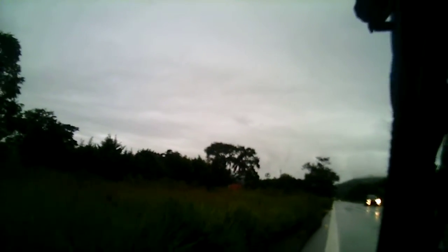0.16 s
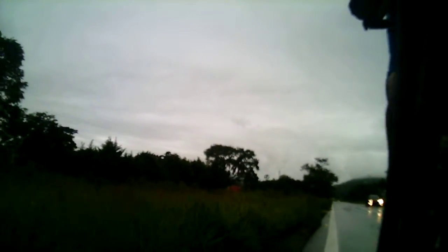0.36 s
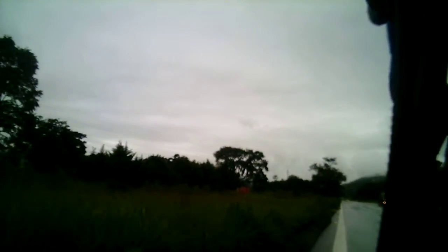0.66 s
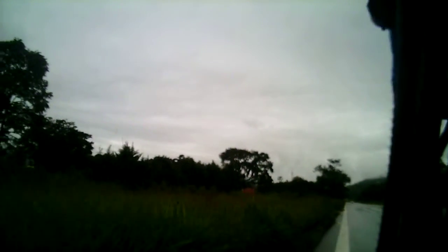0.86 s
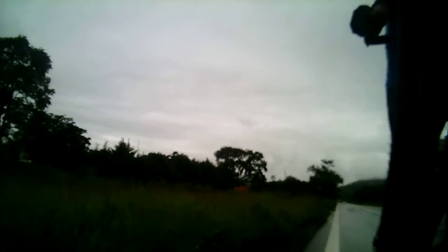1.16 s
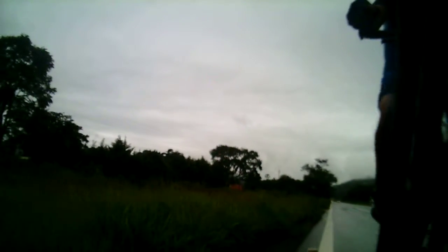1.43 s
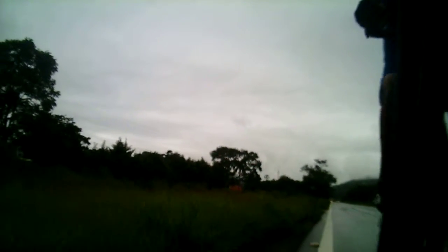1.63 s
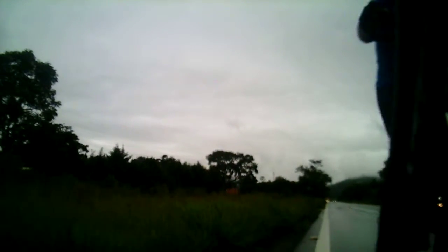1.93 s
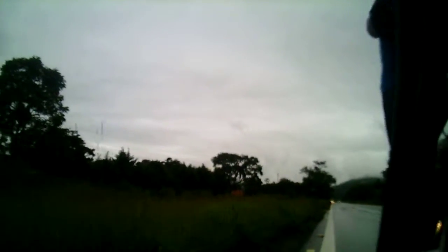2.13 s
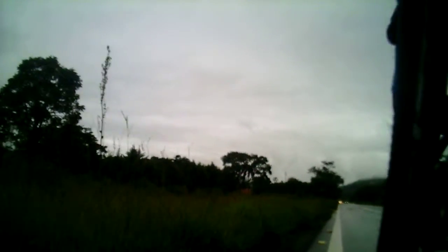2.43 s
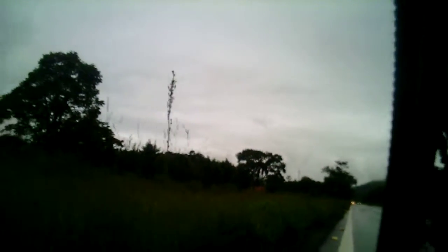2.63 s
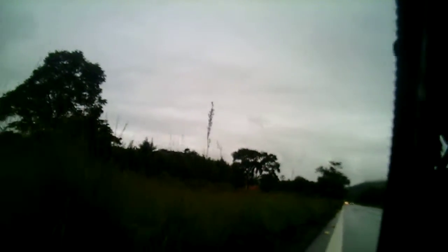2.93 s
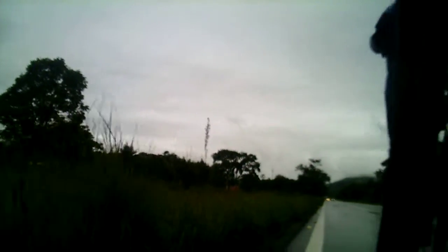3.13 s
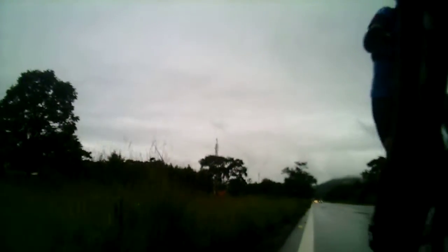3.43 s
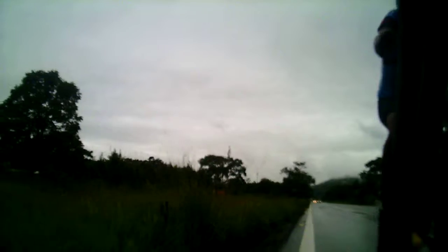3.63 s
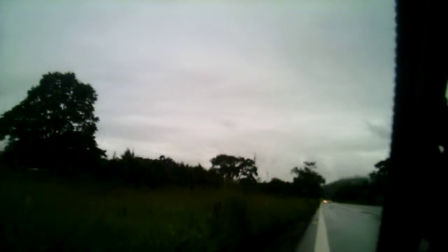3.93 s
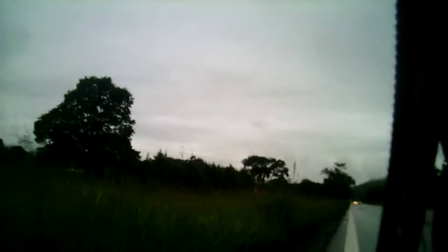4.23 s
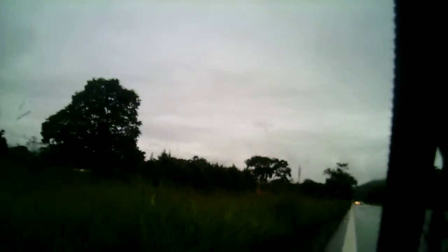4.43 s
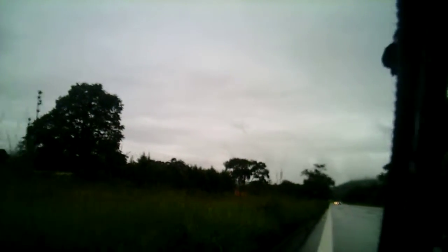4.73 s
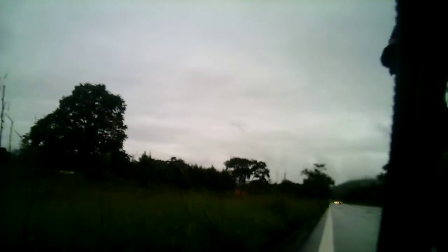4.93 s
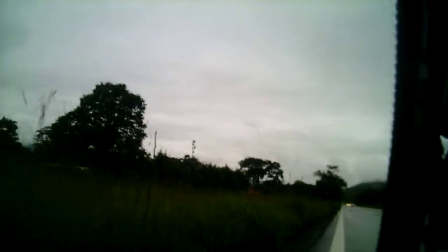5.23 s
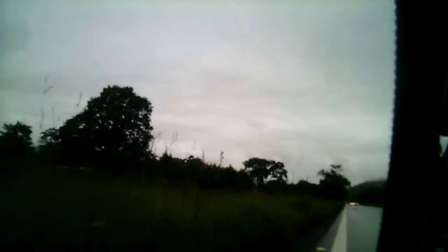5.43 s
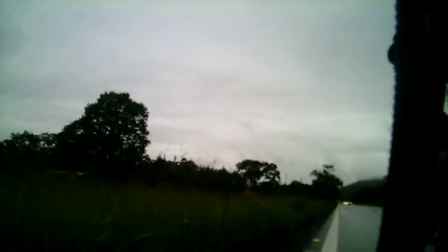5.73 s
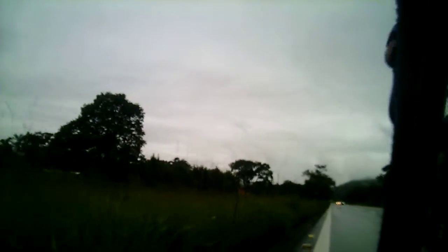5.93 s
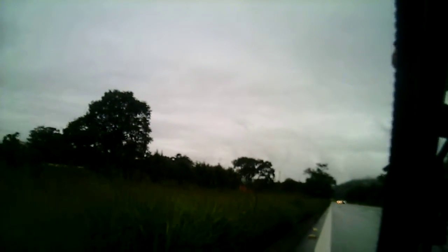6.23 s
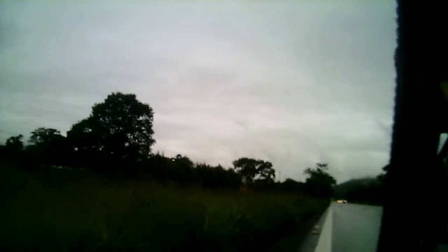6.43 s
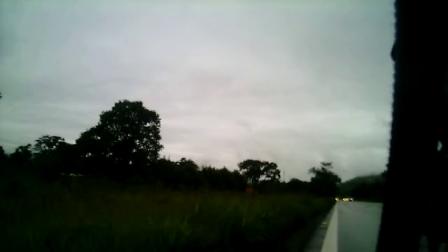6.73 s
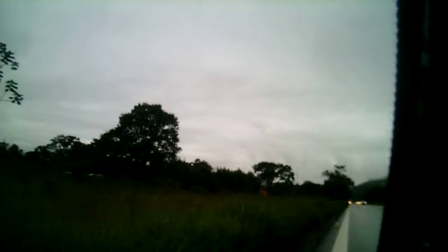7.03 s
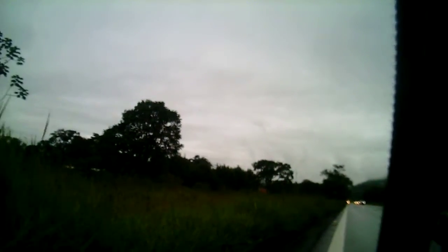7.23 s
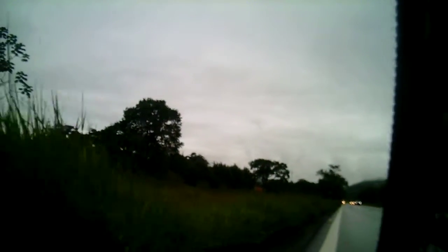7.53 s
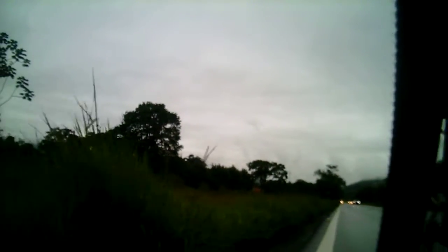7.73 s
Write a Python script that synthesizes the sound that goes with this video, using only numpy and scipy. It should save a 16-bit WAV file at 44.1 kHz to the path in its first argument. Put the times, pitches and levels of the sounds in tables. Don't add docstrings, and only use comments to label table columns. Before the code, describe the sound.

A bicycle rolls along a wet country road, heard through a microphone clamped to its frame. A low tyre hum swells and sinks with each pedal stroke over lumpy rumble and faint gritty buzz. Chain links tick irregularly throughout, with harder knocks and soft bump thuds. After five and a half seconds a stone cracks violently against the case, overloading; another sharp knock follows and the rolling continues.

```python
import sys
import numpy as np
from scipy import signal
from scipy.io import wavfile
from scipy.ndimage import uniform_filter1d

SR = 44100
rng = np.random.default_rng(int(sys.argv[2]) if len(sys.argv) > 2 else 0)


def volts(x):
    e = np.asarray(x, float) / 20
    return 10 ** e


def int16_out(signal):
    q = np.round(np.clip(np.atleast_2d(signal).T, -1, 1) * 32767)
    wavfile.write(sys.argv[1], SR, q.astype(np.int16))


N = 347067

# time in seconds, pitch in Hz.
HUM_PITCH = [(0.0, 94.1), (0.58, 90.5), (1.04, 96.6), (1.29, 92.2), (1.64, 96.0), (2.02, 91.6),
             (2.26, 97.0), (2.94, 93.1), (3.96, 99.7), (4.41, 96.0), (4.66, 100.9), (5.32, 96.0),
             (5.84, 102.8), (6.4, 102.6), (6.49, 96.2), (7.01, 101.2), (7.15, 96.8), (7.87, 96.7)]
# centre in seconds, length in seconds, peak hum in dB.
LOAD_SURGES = [(-0.0, 0.34, -37.5), (0.23, 0.09, -30.5), (0.46, 0.06, -31.5), (0.652, 0.22, -28.5),
               (0.887, 0.25, -36), (1.255, 0.1, -27), (1.386, 0.37, -31), (1.884, 0.23, -29.5),
               (1.97, 0.5, -37), (2.236, 0.22, -33.5), (2.499, 0.16, -31.5), (2.732, 0.36, -36),
               (3.214, 0.39, -27), (3.51, 0.5, -39), (3.719, 0.11, -29.5), (3.85, 0.11, -35),
               (4.061, 0.1, -33), (4.364, 0.32, -33.5), (4.555, 0.14, -37), (4.877, 0.16, -34),
               (5.199, 0.62, -40), (5.502, 0.15, -26), (5.67, 0.23, -32.5), (6.141, 0.34, -31),
               (6.38, 0.08, -31.5), (6.618, 0.22, -29), (6.862, 0.31, -31.5), (7.271, 0.18, -34.5),
               (7.546, 0.29, -35.5), (7.853, 0.2, -27.5)]
# time in seconds, rumble level in dB.
ROAD_COARSENESS = [(0, -40), (.32, -45.5), (.5, -42), (1.0, -44.5), (1.4, -42), (2.9, -42), (3.14, -39.5),
                   (3.62, -43), (4.24, -41), (5.7, -39), (6.6, -39), (7.36, -41.5), (7.87, -41)]
# frequency in Hz, density in dB per Hz.
RUMBLE_SPECTRUM = [(15, -14.5), (28, -27), (42, -23.5), (62, -2), (130, -7.5), (170, -5.5), (245, -10.5),
                   (290, -14.5), (400, -17.5), (550, -21.5), (900, -29)]
# frequency in Hz, width in Hz, level in dB.
FRAME_RESONANCES = [(240, 20, 0), (335, 30, -9), (395, 30, -9)]
# frequency in Hz, width in Hz, level in dB.
CASE_RESONANCES = [(629, 37, -8.5), (783.6, 55.5, -1.5), (1229, 205, -0.5), (1359, 266, -3),
                   (2080, 82, -13.5), (2675, 140, -19)]
# time in seconds, peak in dB.
CHAIN_SNAPS = [(0.28, -42), (0.561, -40), (0.982, -39), (1.039, -42.5), (1.839, -38), (2.503, -37.5),
               (2.626, -35.5), (2.87, -39.5), (2.961, -38), (3.278, -40), (3.615, -39.5), (3.95, -41.5),
               (4.067, -37), (4.527, -37.5), (4.891, -43.5), (5.234, -37), (5.347, -35.5), (5.66, -39),
               (5.756, -38), (5.81, -42.5), (5.872, -36.5), (6.289, -38), (6.704, -43), (6.926, -37.5),
               (7.03, -42.5), (7.239, -39), (7.341, -38.5), (7.576, -39), (7.665, -37), (7.719, -42)]
# time in seconds, peak in dB.
CHAIN_JOLTS = [(0.359, -33.5), (0.469, -32), (0.819, -25), (0.957, -33.5), (1.148, -26), (1.378, -30),
               (1.803, -31.5), (2, -31), (2.3, -28.5), (2.355, -33), (2.414, -26), (2.925, -32),
               (3.026, -30), (3.179, -29.5), (3.229, -27), (3.674, -32), (3.73, -29), (3.843, -27),
               (4.223, -30), (4.268, -29), (4.785, -34.5), (4.8, -29.5), (5.193, -30.5), (5.974, -22.5),
               (5.999, -27), (6.574, -29.5), (6.821, -29), (7.065, -34), (7.408, -30.5), (7.468, -27.5)]
# low modes, high modes and crack, all in dB relative to its peak.
SNAP_MIX = (4.6, -5.5, -2.5)
JOLT_MIX = (-0.77, -17.5, -12)
LINK_MIX = (-2.3, -17.5, -9)
# frequency in Hz, level in dB, 60 dB decay in seconds.
TICK_LOW_MODES = [(1289, -1, 0.023), (1407, 4.5, 0.018)]
TICK_HIGH_MODES = [(2170, -7.5, 0.059), (2652, 9, 0.021), (3300, -7.5, 0.009), (4560, -11, 0.014)]
# frequency in Hz, width in Hz, level in dB.
CRACK_RESONANCES = [(1500, 430, 0), (2560, 1650, -0.5), (3410, 1700, -4), (4500, 1700, -8.5)]
# time in seconds, peak in dB, then low, bright and top modes in dB relative to it.
MOUNT_KNOCKS = [(.351, -34, 2, -27, -34), (.393, -23.5, -9, -19, -15.5), (1.422, -23, -8.5, -10, -15),
                (2.861, -28, -2.5, -20, -46), (3.4612, -20, -8.5, 3, -24), (4.141, -31, -3.5, -9.5, -36),
                (2.401, -31.5, -11, -14, -19), (4.589, -30, -13, -9, -21), (.434, -30, -6, -12, -12),
                (5.066, -31, -4.5, -6, -23), (5.315, -30.5, -12, -6, -13), (5.032, -32.5, -12, -10, -7),
                (5.105, -31, -8, -12, -10), (6.1027, -15.5, -8, -11, -11), (6.162, -31, -3.5, -27, -14)]
# frequency in Hz, level in dB, 60 dB decay in seconds.
KNOCK_BODY_MODES = [(1110, -2, .03), (1205, 0, .028), (1310, -4, .03)]
KNOCK_LOW_MODES = [(754, 0, 0.049), (899, -13.5, 0.14)]
KNOCK_BRIGHT_MODES = [(2090, 0.017, 0.037)]
KNOCK_TOP_MODES = [(2800, -9, 0.013), (3240, -8.5, 0.0041), (4170, -6.5, 0.024), (4870, -10.5, 0.006)]
# time in seconds, peak in dB, upper frame modes in dB relative to it.
ROAD_BUMPS = [(0.433, -23.5, -24), (0.969, -29.5, -7), (1.3, -30, -7), (1.458, -28.5, -7),
              (1.805, -25, -12.5), (2.298, -42, -17), (2.862, -26, -6.5), (3.591, -33, -2.5),
              (4.576, -31, -24), (4.786, -29, -0.5), (5.591, -15.5, -10), (5.973, -31.5, -2),
              (7.08, -29, -12), (7.581, -28.5, -7.5)]
# frequency in Hz, level in dB, 60 dB decay in seconds.
BUMP_LOW_MODES = [(173, -8, 0.041), (234.6, -2.5, 0.096)]
BUMP_HIGH_MODES = [(333.5, 3, 0.065), (394, 0.5, 0.061), (557, -2, 0.05)]
# time in seconds, peak in dB.
STONE_BLOWS = [
    (5.5927, 1),
    (5.5943, 1),
    (5.596, -3),
    (5.5998, -11),
]
# frequency in Hz, level in dB, 60 dB decay in seconds.
STONE_MODES = [(560, -20, .03), (757, -11, 0.027), (1134, 0, .045), (1263, -5, 0.027), (1517, -7.5, 0.022),
               (2054, -2, 0.015), (2510, -7.5, 0.0072), (2740, -17, 0.017), (3280, -17, 0.0038),
               (4644, -10, 0.011), (5400, -13, 0.0036)]
# frequency in Hz, level in dB, 60 dB decay in seconds.
STRUT_MODES = [(745, -29, .33), (1330, -31.5, .15), (2700, -39.5, 0.14)]
# frequency in Hz, width in Hz, level in dB.
HISS_RESONANCES = [(2570, 170, -7), (4075, 260, -1), (4670, 550, -4.5), (5350, 1200, -9.5)]


def rms_one(x):
    return x / np.sqrt(np.mean(x ** 2) + 1e-20)


def in_time(rows):
    s, *columns = np.transpose(rows)
    return [np.interp(np.arange(N) / SR, s, c) for c in columns]


def drift(rate):
    r = np.exp(-40 * np.pi * rate / SR)
    white = rng.standard_normal(N // 20 + 3002)
    slow = signal.lfilter([1], [1, -2 * r, r * r], white)[3000:]
    return np.interp(np.arange(N) / 20, np.arange(len(slow)), rms_one(slow))


def resonances(x, peaks):
    out = 0
    for k, (hz, width, db) in enumerate(peaks):
        r = np.exp(-np.pi * width / SR)
        b = [(1 - r * r) / 2, 0, (r * r - 1) / 2]
        a = [1, -2 * r * np.cos(2 * np.pi * hz / SR), r * r]
        out = out + (-1) ** k * volts(db) * signal.lfilter(b, a, x)
    return out


def strike(times, peak_db, modes, contact_s, spread_db):
    span = np.arange(int(.006 * SR))
    shape = span / (contact_s * SR) * np.exp(-span / (contact_s * SR))
    shape = shape / shape.sum()
    first = np.round(np.asarray(times) * SR).astype(int)
    at = np.minimum(first[:, None] + span, N - 1)
    out = np.zeros(N)
    for hz, db, t60 in modes:
        w = 2 * np.pi * hz / SR
        r = volts(-60 / (t60 * SR))
        luck = rng.standard_normal((len(times), 2))
        push = shape * np.cos(w * span + np.pi * luck[:, :1]) * 2
        strength = volts(peak_db + db + spread_db * luck[:, 1])
        force = np.full(N, 1e-18)
        np.add.at(force, at, push * strength[:, None])
        out += signal.lfilter([0, np.sin(w)], [1, -2 * r * np.cos(w), r * r], force)
    return out


def load():
    idle_db = -48.5
    s, length, db = np.transpose(LOAD_SURGES)[:, :, None]
    t = np.arange(0, N + 100, 100) / SR
    power = np.sum(volts(2 * db) * np.exp(-8 * ((t - s) / length) ** 2), axis=0)
    return np.interp(np.arange(N) / SR, t, 10 * np.log10(power + volts(2 * idle_db)))


def hum():
    octave_db, octave_follows, stroke_s = -46.5, 0.74, .2
    hz, = in_time(HUM_PITCH)
    level_db = load()
    stroke_db = uniform_filter1d(level_db, int(stroke_s * SR))
    second_db = octave_db + octave_follows * (stroke_db - stroke_db.mean())
    phase = 2 * np.pi * np.cumsum(hz * (1 + .022 * drift(14))) / SR
    tone = np.sqrt(2) * volts(level_db + 1.3 * drift(20)) * np.sin(phase)
    octave = volts(second_db + 2.5 + 1.4 * drift(13)) * np.sin(2 * phase + .7)
    return tone + octave


def rumble(level_db):
    white = rng.standard_normal((2, N))
    edges = 14 * 2 ** np.arange(0, 6.4, 1 / 3)
    spectrum_hz, spectrum_db = np.transpose(RUMBLE_SPECTRUM)
    together = drift(7)
    out = 0
    for k, (low, high) in enumerate(zip(edges, edges[1:])):
        sos = signal.butter(2, [low, high], "band", fs=SR, output="sos")
        band = signal.sosfilt(sos, white[k % 2])
        db = np.interp(np.log(low * high) / 2, np.log(spectrum_hz), spectrum_db)
        out = out + band * volts(db + 3.3 * together + 1.5 * drift(23))
    shaking = rng.standard_normal(N) * volts(3.0 * drift(2.0))
    out = out + volts(0.5) * resonances(shaking, FRAME_RESONANCES)
    return volts(level_db + 2.5) * rms_one(out)


def case_grit(road_db):
    mean_db, follows_road, grains_per_s = -47, 0.54, 2500.
    level_db = mean_db + follows_road * (road_db - road_db.mean())
    sizes = volts(4.46 * np.minimum(rng.exponential(1, N), 5)) * rng.choice([-1, 1], N)
    grains = sizes * (rng.random(N) < grains_per_s * volts(3.5 * drift(25)) / SR)
    ringing = resonances(grains, CASE_RESONANCES)
    damped = signal.sosfilt(signal.butter(6, 3200, fs=SR, output="sos"), ringing)
    return volts(level_db) * rms_one(damped)


def quiet_links():
    links_per_s, jitter_s, level_db, spread_db = 18.5, .008, -40.5, 4.5
    contacts = CHAIN_SNAPS + CHAIN_JOLTS + MOUNT_KNOCKS + STONE_BLOWS[:1]
    loud = np.sort([0, N / SR] + [row[0] for row in contacts])
    gaps = []
    for a, b in zip(loud, loud[1:]):
        steps = max(round((b - a) * links_per_s), 1)
        gaps.append(np.linspace(a, b, steps + 1)[1:-1])
    s = np.concatenate(gaps)
    luck = rng.standard_normal((len(s), 2))
    return s + jitter_s * luck[:, 0], level_db + spread_db * luck[:, 1]


def rebounds():
    s, db = np.transpose(CHAIN_JOLTS)
    return s + rng.uniform(.012, .03, len(s)), db - 10.5 + rng.uniform(-4, 4, len(s))


def cracks(times, peak_db, fade_s):
    hits = np.zeros(N)
    hits[np.round(times * SR).astype(int)] = volts(peak_db)
    r = np.exp(-1 / (fade_s * SR))
    envelope = signal.lfilter([1 - r], [1, -2 * r, r * r], hits + 1e-18) * np.e
    white = rng.standard_normal(N)
    return resonances(white * envelope, CRACK_RESONANCES) / np.std(resonances(white, CRACK_RESONANCES))


def ticks():
    kinds = [(np.transpose(CHAIN_SNAPS), SNAP_MIX), (np.transpose(CHAIN_JOLTS), JOLT_MIX),
             (quiet_links(), LINK_MIX), (rebounds(), LINK_MIX)]
    s = np.concatenate([at for (at, db), mix in kinds])
    levels = [db + np.array(mix)[:, None] for (at, db), mix in kinds]
    low_db, high_db, crack_db = np.concatenate(levels, axis=1)
    low = strike(s, low_db, TICK_LOW_MODES, contact_s=.001, spread_db=2.5)
    high = strike(s, high_db, TICK_HIGH_MODES, contact_s=0.00051, spread_db=3.5)
    return low + high + cracks(s, crack_db, fade_s=0.0019)


def knocks():
    s, peak_db, low_db, bright_db, top_db = np.transpose(MOUNT_KNOCKS)
    body = strike(s, peak_db - 4, KNOCK_BODY_MODES, contact_s=0.0007, spread_db=2)
    low = strike(s, peak_db + low_db, KNOCK_LOW_MODES, contact_s=0.00029, spread_db=-0.3)
    bright = strike(s, peak_db + bright_db, KNOCK_BRIGHT_MODES, contact_s=.0008, spread_db=.1)
    top = strike(s, peak_db + top_db, KNOCK_TOP_MODES, contact_s=.0006, spread_db=2)
    return body + low + bright + top + cracks(s, peak_db - 11, fade_s=.002)


def bumps():
    s, peak_db, upper_db = np.transpose(ROAD_BUMPS)
    low = strike(s, peak_db, BUMP_LOW_MODES, contact_s=0.0011, spread_db=2.5)
    high = strike(s, peak_db + upper_db - 1, BUMP_HIGH_MODES, contact_s=.0011, spread_db=1.5)
    return low + high


def stone():
    s, peak_db = np.transpose(STONE_BLOWS)
    blows = strike(s, peak_db, STONE_MODES, contact_s=.0003, spread_db=2)
    return blows + strike(s[:1], np.zeros(1), STRUT_MODES, contact_s=.001, spread_db=0)


def scene():
    road_db, = in_time(ROAD_COARSENESS)
    steady = hum() + rumble(road_db) + case_grit(road_db)
    return (steady + ticks() + knocks() + bumps() + stone())[None]


def step_size(x):
    block, knee, rise_db = 128, .016, 12
    swing = signal.sosfilt(signal.butter(1, 700, fs=SR, output="sos"), x)
    peak = np.abs(np.pad(swing, (0, -N % block))).reshape(-1, block).max(axis=1)
    doublings = np.clip(np.ceil(np.log2(peak / knee + 1e-9)), 0, 4)
    steps = np.repeat(volts(rise_db * doublings ** .72), block)[:N]
    return uniform_filter1d(steps, size=20)


def band_limit(x):
    return signal.sosfilt(signal.butter(12, 16420, fs=SR, output="sos"), x)


def record(dry):
    cutoff_hz, overload = 6115, .71
    hiss = rms_one(resonances(rng.standard_normal(N), HISS_RESONANCES))
    hissy = dry + volts(-78) * step_size(dry[0]) * hiss
    dull = signal.sosfilt(signal.butter(4, cutoff_hz * 0.74, fs=SR, output="sos"), hissy)
    dull = signal.sosfilt(signal.cheby2(10, 60, cutoff_hz * 1.131, fs=SR, output="sos"), dull)
    bent = dull / (1 + np.abs(dull / overload) ** 30) ** (1 / 30)
    bent = signal.sosfilt(signal.butter(1, 12000, fs=SR, output="sos"), bent)
    return band_limit(bent)


dry = scene()
out = record(dry)
int16_out(out)
```